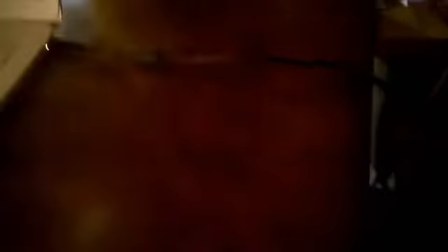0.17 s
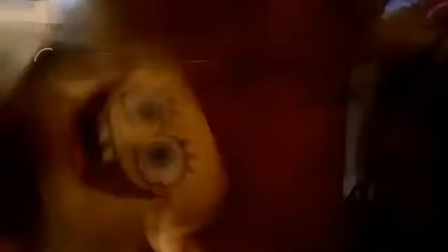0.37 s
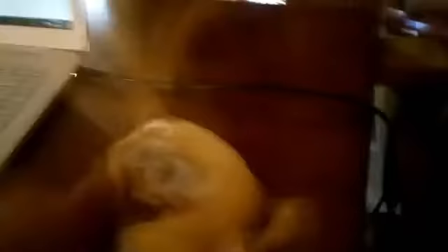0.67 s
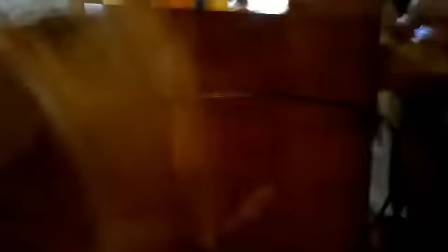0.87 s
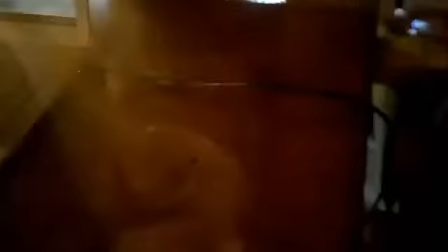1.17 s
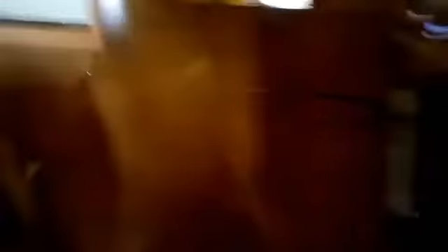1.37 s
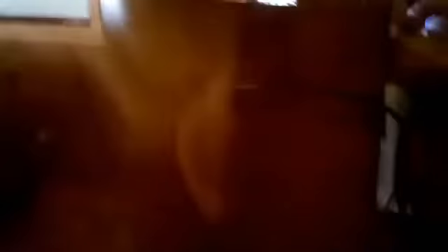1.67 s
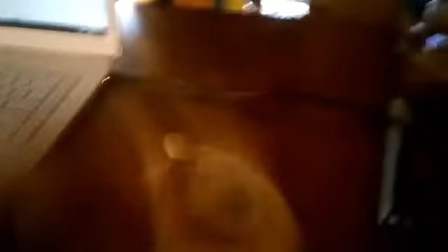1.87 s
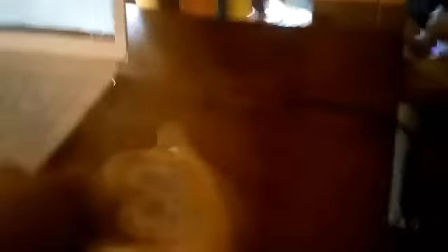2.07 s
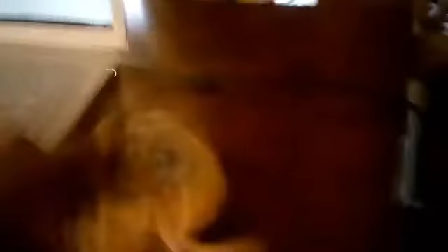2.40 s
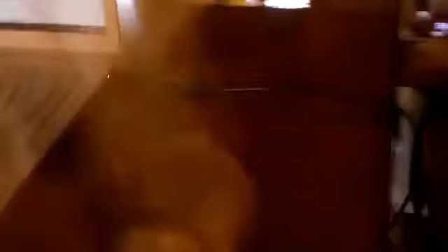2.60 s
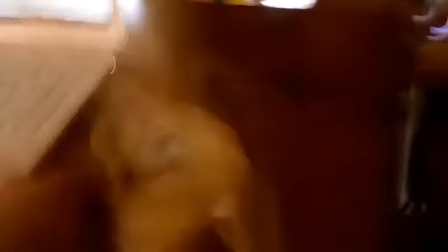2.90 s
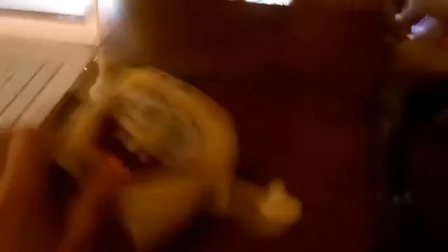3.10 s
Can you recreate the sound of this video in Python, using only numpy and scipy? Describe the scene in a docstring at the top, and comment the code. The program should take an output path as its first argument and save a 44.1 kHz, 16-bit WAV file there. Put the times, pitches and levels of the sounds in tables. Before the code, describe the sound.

A hand-held toy raps a wooden desk about three times a second, with faint swishes between.

```python
"""A faint rumble and hiss, then a soft swish, lead into the first of ten knocks of a toy on a wooden desk.
The toy is held in the hand, close to the microphone in a small room; each swing is a swell of coloured noise.
Each knock is a noise burst that lands, rebounds and rattles, over decaying modes of the desk and a room tail.
Light taps, made of shorter and duller bursts, fall around the knocks; one sharp modal click follows the last."""
import sys
import numpy as np
from scipy import signal
from scipy.fft import rfft, irfft, next_fast_len
from scipy.io import wavfile
from scipy.ndimage import map_coordinates

SR = 44100
rng = np.random.default_rng(int(sys.argv[2]) if len(sys.argv) > 2 else 0)


def inscribe(sig):
    """Save sig as 16-bit PCM at rate SR to the path in sys.argv[1].

    A 1-D sig is mono; a 2-D sig holds one channel per row.
    Samples are clipped to [-1, 1] before scaling.
    """
    pcm = np.round(np.clip(np.atleast_2d(sig).T, -1, 1) * 32767)
    wavfile.write(sys.argv[1], SR, pcm.astype(np.int16))


N = 143325  # samples, 3.25 s


def amp(db):
    """Decibels to gain."""
    return 10 ** (np.asarray(db) / 20)


def unit(x):
    """Scale to rms 1."""
    return x / np.sqrt(np.mean(x ** 2) + 1e-20)


def along(points, hz):
    """Read a curve of (Hz, value) points on a log frequency axis."""
    point_hz, values = np.transpose(points)
    return np.interp(np.log(hz + 1), np.log(point_hz + 1), values)


def add(track, start_s, sound):
    """Mix a sound into the track in place, cut at the track's end."""
    part = track[round(start_s * SR):][:len(sound)]
    part += sound[:len(part)]


def filtered(x, response):
    """Multiply the spectrum of x by a response of frequency, without phase shift."""
    size = next_fast_len(len(x) + SR // 4)
    hz = np.fft.rfftfreq(size, 1 / SR)
    return irfft(rfft(x, size) * response(hz), size)[:len(x)]


def coloured(x, gain_db, size=4096):
    """Minimum-phase filter with the given dB against frequency, so that nothing sounds early."""
    hz = np.fft.rfftfreq(size, 1 / SR)
    cepstrum = irfft(np.log(amp(gain_db(hz))))
    # folding the cepstrum onto positive times makes the filter causal
    cepstrum[1:size // 2] *= 2
    cepstrum[size // 2 + 1:] = 0
    impulse = irfft(np.exp(rfft(cepstrum)))
    return signal.fftconvolve(x, impulse)


def dulling_db(hz, corner_hz):
    """Treble loss: 6 dB at the corner, nearing 24 dB per octave above it."""
    return -20 * np.log10(1 + (hz / corner_hz) ** 4)


def noise(spectrum):
    """Steady coloured noise of rms 1."""
    white = rng.standard_normal(N)
    return unit(filtered(white, lambda hz: amp(along(spectrum, hz))))


def dying(t60s, size=128):
    """Dense ringing that starts near rms 1; each frequency dies at its own speed."""
    white = rng.standard_normal(SR // 2)
    hz, t, cells = signal.stft(white, SR, nperseg=size)
    decay_db = -60 * t / along(t60s, hz)[:, None]
    return signal.istft(cells * amp(decay_db), SR, nperseg=size)[1]


def burst(spectrum, t60s, attack_s):
    """A coloured burst of dense ringing with a rounded start, levelled by the spectrum's mean power."""
    ring = dying(t60s)
    ring = ring * (1 - np.exp(-np.arange(len(ring)) / SR / attack_s))
    even_hz = np.linspace(0, SR / 2, SR // 20)
    power = np.mean(amp(along(spectrum, even_hz)) ** 2)
    return coloured(ring, lambda hz: along(spectrum, hz)) / np.sqrt(power)


def modes(table, attack_s, scatter_db):
    """Struck modes as decaying cosines, neighbours swinging in opposite directions."""
    t = np.arange(SR * 3 // 4) / SR
    ring = np.zeros(len(t))
    for k, (hz, db, t60_s) in enumerate(table):
        sign = 1 if k % 2 else -1
        level_db = db + rng.normal(0, scatter_db)
        ring += sign * amp(level_db - 60 * t / t60_s) * np.cos(2 * np.pi * hz * t)
    return ring * (1 - np.exp(-t / attack_s))


# Tone of the rumble and hiss. Each row: frequency in Hz, relative level in dB per Hz.
HUSH_SPECTRUM = [(20, -5), (35, -14), (55, 1.5), (75, -4.5), (100, 2), (140, 0.5), (200, -12), (322, -18),
                 (482, -27.5), (700, -33), (1570, -36.5), (2700, -37.5), (3720, -35.5), (5730, -34.5),
                 (6550, -36.5), (8130, -54), (13500, -55.5), (15000, -44)]
HUSH_DB, HUSH_DRIFT_DB = -46.5, 1.2  # level, and the spread of its drift


def hush(count=26):
    """Low rumble and hiss: steady noise whose level drifts between random points."""
    places = np.linspace(0, count - 1, N)
    drift = map_coordinates(rng.standard_normal(count), [places], mode="nearest")
    return amp(HUSH_DB + HUSH_DRIFT_DB * drift) * noise(HUSH_SPECTRUM)


# Swings of the arm. Each row: time of the peak in seconds, relative level in dB,
# half width in seconds (where the swell has fallen to 1/e).
SWINGS = [(0.184, 5, 0.033), (0.507, 1, 0.034), (.805, -0.5, 0.025), (1.112, -0.5, 0.032),
          (1.405, -7.5, 0.058), (1.705, -6, 0.027), (1.985, -2.5, 0.035), (2.282, -0.5, 0.025),
          (2.567, 1.5, 0.045), (2.832, 2, 0.026), (3.108, 4.5, 0.017)]
# Tone of the swish. Each row: frequency in Hz, relative level in dB per Hz.
SWISH_SPECTRUM = [(300, 2), (1100, -21.5), (1900, -2.5), (3300, -4.5), (5500, 7.5), (7000, -4.5),
                  (8300, -13), (15000, -23)]
SWISH_DB = -55.5


def swishes():
    """A soft rustle of noise swells and fades with the speed of each swing."""
    t = np.arange(N) / SR
    speed = np.zeros(N)
    for peak_s, db, width_s in SWINGS:
        speed += amp(db) * np.exp(-np.square((t - peak_s) / width_s))
    return amp(SWISH_DB) * speed * noise(SWISH_SPECTRUM)


# Modes of the sharp click. Each row: frequency in Hz, level in dB before dulling, t60 in seconds.
CLICK_MODES = [(1200, -23.5, 0.0052), (1750, -22.5, 0.0067), (2400, -19, 0.014), (2910, -23.5, 0.011),
               (3670, -17, 0.0046), (4700, -24.5, .0035), (6400, -11.5, 0.0029)]
CLICK_S, CLICK_ATTACK_S, CLICK_DULL_HZ = 2.9515, .0001, 8550


def click():
    """One dry, hard click of very short modes with the top treble dulled."""
    out = np.zeros(N)
    ring = modes(CLICK_MODES, CLICK_ATTACK_S, 0)
    add(out, CLICK_S, coloured(ring, lambda hz: dulling_db(hz, CLICK_DULL_HZ)))
    return out


# Tone of the room's answer. Each row: frequency in Hz, relative level in dB per Hz.
ROOM_SPECTRUM = [(120, 3), (300, 2.5), (700, 6), (1200, -0.5), (2000, -5.5), (2900, -8), (3900, -2),
                 (6000, -12.5), (7200, -19), (8300, -34), (15000, -48)]
# Decay of the room. Each row: frequency in Hz, t60 in seconds.
ROOM_T60 = [(150, 0.49), (600, 0.17), (2000, 0.27), (5000, 0.21), (12000, 0.54)]
ROOM_DB, ROOM_RISE_S = -31, 0.0078  # level before each blow's own colour


def room():
    """The room's diffuse answer to one blow: a slowly rising, dense noise tail."""
    return amp(ROOM_DB) * burst(ROOM_SPECTRUM, ROOM_T60, ROOM_RISE_S)


# Dense resonances of toy and wood. Each row: frequency in Hz, relative level in dB per Hz.
CLACK_SPECTRUM = [(130, -6), (230, 3.5), (400, -0.5), (560, 1.5), (800, 0), (1250, -9), (1700, -1),
                  (2400, -3.5), (2900, -14), (3900, -2.5), (5600, -8.5), (7000, -20.5), (8300, -30),
                  (10000, -33.5), (15000, -41.5)]
CLACK_DB, CLACK_ATTACK_S = -17, 0.0003  # level before each blow's own colour


def contact(t60s):
    """One touch of toy on wood: a burst of their dense resonances."""
    return amp(CLACK_DB) * burst(CLACK_SPECTRUM, t60s, CLACK_ATTACK_S)


# Light contacts. Each row: start in seconds, relative level in dB, dulling corner in Hz.
TAPS = [(.643, -23.5, 4000), (1.1578, -2.5, 1500), (1.1695, -20, 2300), (1.175, 2.5, 1700),
        (1.1822, -14, 4500), (2.0512, -9.5, 2010), (2.129, -13.5, 2440), (2.4087, -4, 1700),
        (2.6167, -15, 750), (2.772, -23.5, 2200), (3.101, -29, 8000), (3.21, -17, 600)]
TAP_T60_S = 0.019
TAP_ROOM_DB = -14.5  # on top of the room's own level


def taps():
    """Duller touches around the knocks, with one short decay at all frequencies and less room."""
    out = np.zeros(N)
    for start_s, db, dull_hz in TAPS:
        touch = contact([(dull_hz, TAP_T60_S)]) + amp(TAP_ROOM_DB) * room()
        add(out, start_s, coloured(touch, lambda hz: db + dulling_db(hz, dull_hz)))
    return out


# Decay of the clack. Each row: frequency in Hz, t60 in seconds.
CLACK_T60 = [(200, 0.066), (700, 0.038), (2000, 0.026), (5000, 0.017), (12000, 0.042)]
RATTLE_FROM_S, RATTLE_TO_S = .011, .024  # the toy chatters within this span after landing


def clatter(rebound_s, rebound_db, rattle_db, count=2):
    """The same spot is hit on landing, on the rebound and in a brief rattle."""
    touch = contact(CLACK_T60)
    out = touch.copy()
    add(out, rebound_s, amp(rebound_db) * touch)
    out /= np.hypot(1, amp(rebound_db))  # landing and rebound share one blow's power
    for rattle_s in rng.uniform(RATTLE_FROM_S, RATTLE_TO_S, size=count):
        add(out, rattle_s, amp(rattle_db) / np.sqrt(count) * touch)
    return out


# The knocks. Each row: start in seconds, rebound delay in seconds, rebound level in dB against the landing,
# boom gain in dB, ring gain in dB, rattle level in dB, note of the struck spot in Hz, level of that note in dB,
# then four colour gains in dB, one at each colour frequency.
KNOCKS = [(0.2407, .0035, -6, 2.5, 4.5, -15, 388, -25.5, 3.5, 1.5, 4.5, 4),
          (.56, 0.0036, 11, -1, 1.5, -15.5, 544, -18.5, 3.5, 6.5, 6.5, 0),
          (0.8582, 0.006, -4, 0, 1, -11.5, 750, -29.5, 0.5, -2.5, 0.5, -0.5),
          (1.1633, 0.006, -5.5, -3, -3.5, -7.5, 523, -28, 3, 0, -4, -0.5),
          (1.4615, .003, -3, -2.5, -2.5, -10.5, 586, -31.5, 1, 0.5, 0, 0),
          (1.7677, 0.0061, 8, -9, -9.5, -4.5, 731, -34.5, -5.5, -7.5, -3.5, -8.5),
          (2.0609, .008, -8, -8.5, -4.5, -9, 175, -23, 6.5, -2.5, 1.5, -0.5),
          (2.338, 0.0029, -14, -1, -2.5, -6, 354, -27.5, 0, -6, 0, -5.5),
          (2.6284, 0.0028, -9, 2.5, -3, -9.5, 180, -28.5, 1.5, -4, -1, 2),
          (2.8895, 0.0032, 0.5, -1, -2.5, -8.5, 775, -28.5, 0.5, 0, -1, 0)]
# Colour frequencies in Hz, one per colour gain.
COLOUR_HZ = [220, 750, 1900, 5000]
# Deep modes of the desk top. Each row: frequency in Hz, level in dB before gain and scatter, t60 in seconds.
DESK_BOOM = [(93.3, -19.5, 0.32), (125.6, -11.5, 0.073), (133, -34.5, 0.45), (179, -33, 0.28)]
# Higher modes of wood and toy. Each row: frequency in Hz, level in dB before gain and scatter, t60 in seconds.
DESK_RING = [(228.2, -32.5, 0.19), (292, -35, 0.086), (384.8, -36, 0.15), (554.4, -28.5, 0.076),
             (760, -27, 0.049), (1036, -38, 0.06), (1273, -39.5, 0.18), (1953, -33.5, 0.098),
             (2335, -31, 0.024), (3727, -41, 0.038), (3790, -34, 0.017), (4360, -43, 0.075),
             (5570, -31.5, 0.042)]
BOOM_ATTACK_S, RING_ATTACK_S = 0.002, .0006
BOOM_SCATTER_DB, RING_SCATTER_DB = 1, 2.5  # random spread of each mode's level
SPOT_T60_S = 0.094


def knocks():
    """Each blow clacks, booms and rings the desk, adds its spot's note on the rebound and excites the room."""
    out = np.zeros(N)
    for (start_s, rebound_s, rebound_db, boom_db, ring_db, rattle_db,
         spot_hz, spot_db, *colour_db) in KNOCKS:
        clack = clatter(rebound_s, rebound_db, rattle_db) + room()
        colour = list(zip(COLOUR_HZ, colour_db))
        boom = modes(DESK_BOOM, BOOM_ATTACK_S, BOOM_SCATTER_DB)
        ring = modes(DESK_RING, RING_ATTACK_S, RING_SCATTER_DB)
        spot_note = modes([(spot_hz, spot_db, SPOT_T60_S)], RING_ATTACK_S, 0)
        add(out, start_s, coloured(clack, lambda hz: along(colour, hz)))
        add(out, start_s, amp(boom_db) * boom)
        add(out, start_s, amp(ring_db) * ring)
        add(out, start_s + rebound_s, spot_note)
    return out


def scene():
    """Swishes, click, taps and knocks over the room's low rumble and hiss, as one channel."""
    return (hush() + swishes() + click() + taps() + knocks())[None]


LOW_CUT_HZ, TOP_HZ = 26.6, 15300
PEAK_LIMIT = .38  # rounded peaks approach this amplitude before the band limit


def record(dry):
    """The microphone thins the deepest bass, rounds off the highest peaks and keeps nothing above its band limit."""
    thin = filtered(dry[0], lambda hz: hz ** 2 / np.hypot(hz ** 2, LOW_CUT_HZ ** 2))
    rounded = thin / (1 + np.abs(thin / PEAK_LIMIT) ** 4) ** (1 / 4)
    return filtered(rounded, lambda hz: hz < TOP_HZ)[None]


dry = scene()
out = record(dry)
inscribe(out)
```